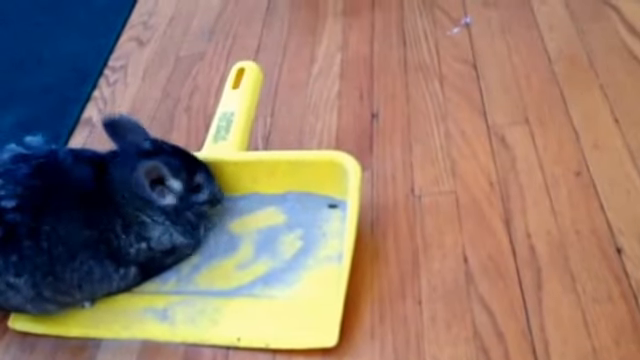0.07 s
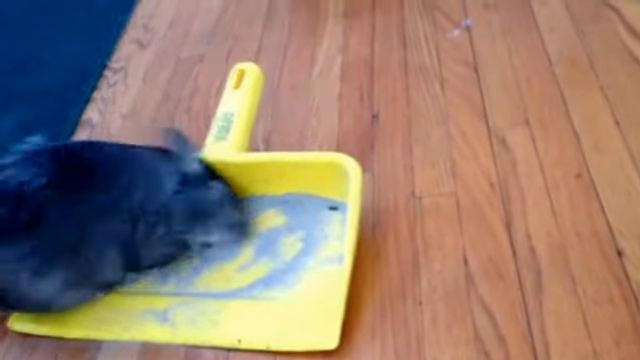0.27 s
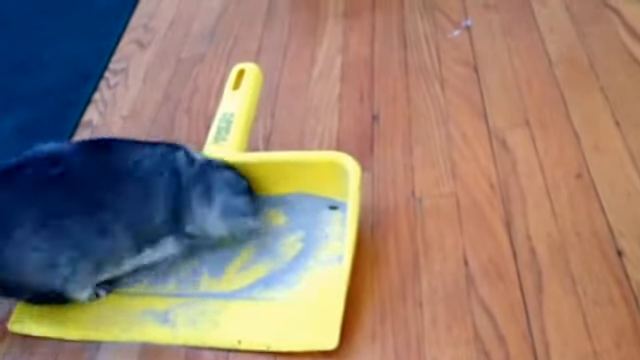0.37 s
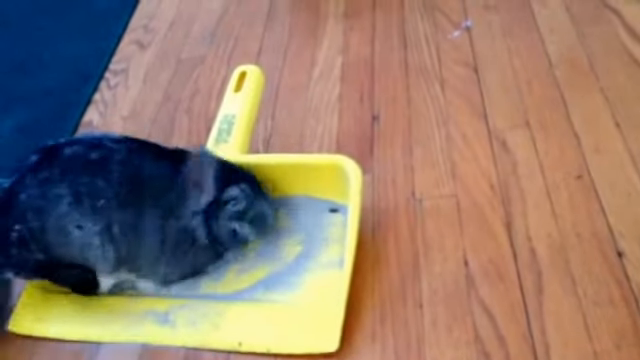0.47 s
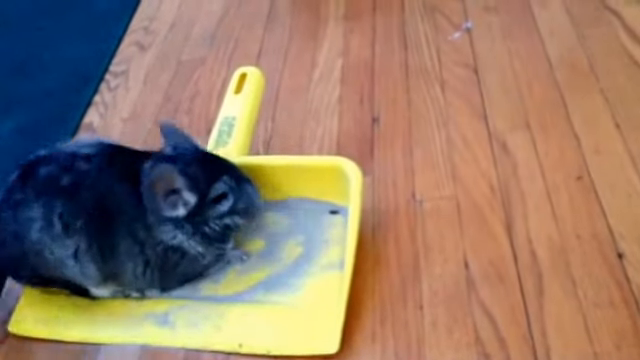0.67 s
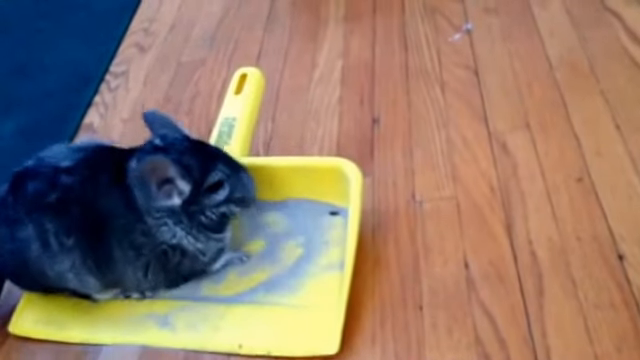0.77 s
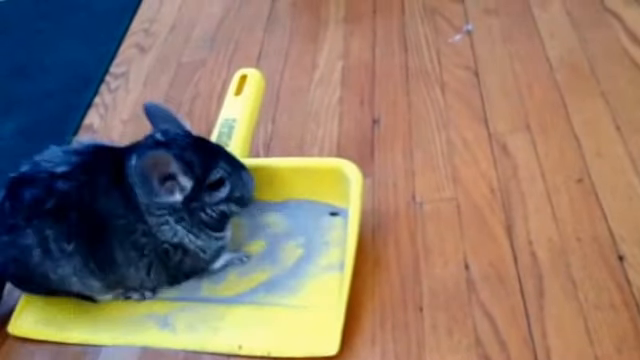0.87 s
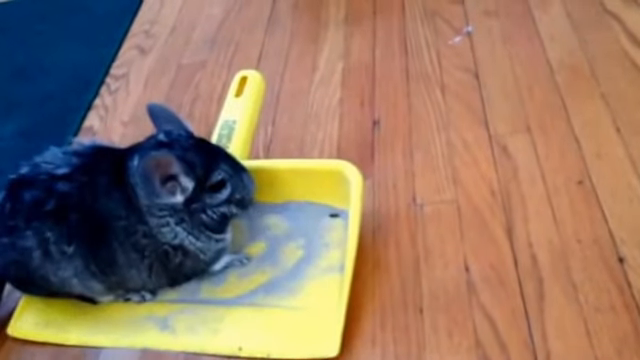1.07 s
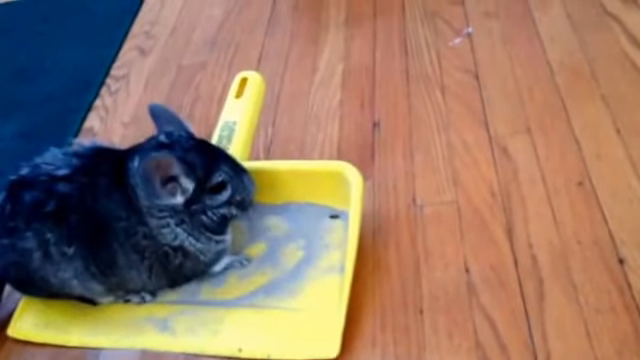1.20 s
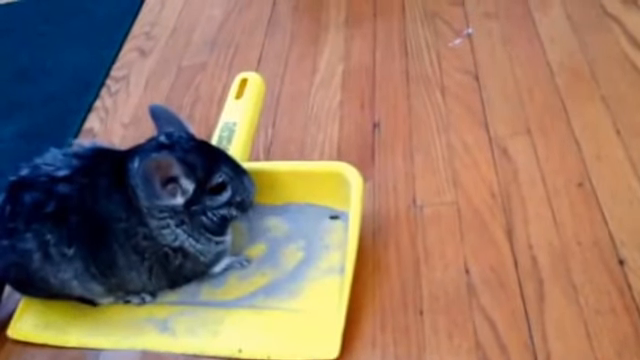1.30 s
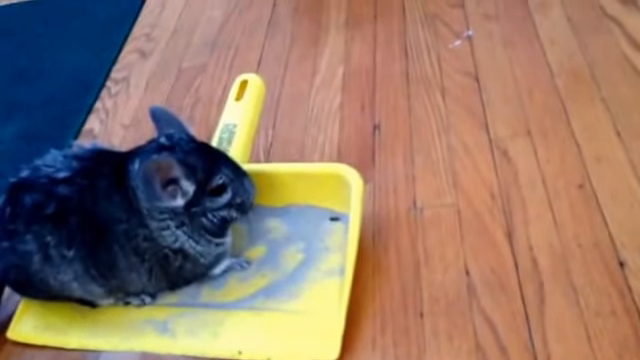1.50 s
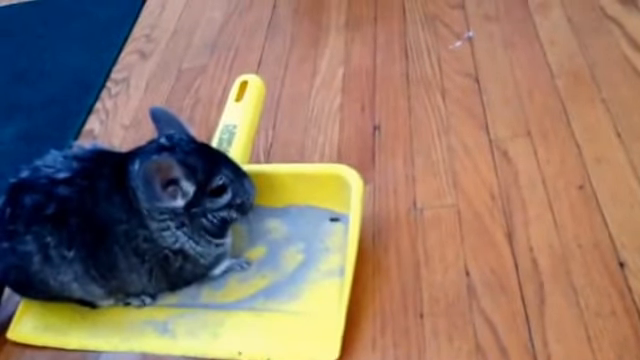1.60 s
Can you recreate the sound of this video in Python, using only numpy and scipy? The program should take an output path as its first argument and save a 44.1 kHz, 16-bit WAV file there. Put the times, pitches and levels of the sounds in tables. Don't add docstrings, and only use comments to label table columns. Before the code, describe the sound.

Faint rustling of a small furry animal leads to two hollow plastic knocks on a wooden floor, a quick clatter and claw scuffs, fading into quiet room tone with low rumble and microphone hiss.

```python
import sys
import numpy as np
from scipy import signal
from scipy.fft import rfft, irfft
from scipy.io import wavfile
from scipy.ndimage import uniform_filter1d

SR = 44100
rng = np.random.default_rng(int(sys.argv[2]) if len(sys.argv) > 2 else 0)


def gain_from_db(level_db):
    decades = np.asarray(level_db, float) / 20
    return 10 ** decades


def dump(signal):
    limited = np.clip(np.atleast_2d(signal).T, -1, 1)
    pcm = np.round(limited * 32767).astype(np.int16)
    wavfile.write(sys.argv[1], SR, pcm)


N = 72765
ROOM_DB, BRIGHT_ROOM_DB = -10, -9


def evened(x):
    return x / np.sqrt(np.mean(x ** 2) + 1e-20)


def read(points, hz):
    f, value = np.transpose(points)
    return np.interp(np.log(hz + 1), np.log(f + 1), value)


def add(mix, start_s, sound):
    part = mix[round(start_s * SR):][:len(sound)]
    part += sound[:len(part)]


def colour(x, points):
    gain = gain_from_db(read(points, np.fft.rfftfreq(len(x), 1 / SR)))
    return irfft(rfft(x) * gain, len(x))


def resonate(x, hz, width_hz):
    pole = np.exp((2j * hz - abs(width_hz)) * np.pi / SR)
    return 2 * signal.lfilter([1 - abs(pole)], [1, -pole], x).real


def resonate_twice(x, hz, width_hz):
    return resonate(resonate(x, hz, width_hz), hz, width_hz)


# f/Hz, level/dB, t60/s
PAN_MODES = [(211, -15.5, 0.037), (325, -10, 0.056), (354, 0, 0.056), (453, 1.5, 0.06), (527, -4, 0.039),
             (615, -2, 0.015), (678, -3.5, 0.042), (793, 0, 0.039), (830, 2, 0.029), (991.4, -0.5, 0.03),
             (1107, -3.5, 0.036), (1261, -6.5, 0.037), (1512, -3.5, 0.063), (1820, -12.5, 0.014)]


def pan_ring(t, blow_db, contact_ms, chance, sides):
    scatter_db = 2
    ring = np.zeros(len(t))
    for (hz, db, t60), c, side in zip(PAN_MODES, chance, sides):
        ring += side * gain_from_db(db + scatter_db * c - 60 * t / t60) * np.sin(2 * np.pi * hz * t)
    u = t[:800] * 3000 / contact_ms
    force = u * np.exp(-u)
    return gain_from_db(blow_db - 8.5) * signal.fftconvolve(ring, force / sum(force))


def board_boom(t):
    hz, db, t60_s, rise_s = 74, -26, 0.88, 0.025
    return gain_from_db(db - 60 * t / t60_s) * (1 - np.exp(-t / rise_s)) * np.sin(2 * np.pi * hz * t)


# f/Hz, width/Hz, level/dB
EDGE_MODES = [(2180, 1660, 10), (3400, 1400, 8.6), (4600, 1900, 4), (6100, 500, -1.5), (7870, 2200, -18),
              (11700, 3500, -30)]


def edge_crack(crack_db, noise):
    rise_ms, grit_db = 0.55, -6
    u = np.arange(len(noise)) / SR * 1000 / rise_ms
    snap = np.pad(gain_from_db(grit_db) * noise * u * np.exp(-u * u), (0, 2000))
    snap[round(rise_ms * SR / 1000)] -= 1
    crack = sum(gain_from_db(db) * resonate_twice(snap, hz, width) for hz, width, db in EDGE_MODES)
    return gain_from_db(crack_db) * crack / abs(crack).max()


# t/s, edge crack level/dB, blow level/dB, contact/ms
KNOCKS = [(.196, -68, -47.5, 0.22), (.208, -56, -48, 0.23), (.2218, -34.5, -28.5, 0.25),
          (.2335, -48, -40, 0.15), (.2435, -52, -39, 0.3), (.2555, -68, -35, 0.46), (.282, -51, -43, 0.21),
          (.3526, -14, -24.5, 0.16), (.358, -52, -30.5, 0.2), (.369, -56, -35, 0.22),
          (.3865, -56, -32, 0.14), (.424, -58, -37.5, 0.29), (.448, -63, -47.5, 0.45),
          (.478, -41.5, -42.5, 0.72), (.495, -55, -48, .4), (.598, -62, -54, .7)]


def knocks():
    pan_cut_hz, ring_delay_s = 151, 0.00052
    rattle_db, crack_rattle_db, rattle_speed = -4.5, -11, 6.1
    t = np.arange(SR // 2) / SR
    body, boards, edge = np.zeros((3, N))
    chance = rng.standard_normal((30, len(PAN_MODES)))
    grit = rng.standard_normal((30, 80))
    sides = rng.choice([-1., 1.], chance.shape)
    boom = board_boom(t)
    for k, (start_s, crack_db, blow_db, contact_ms) in enumerate(KNOCKS):
        add(body, start_s + ring_delay_s, pan_ring(t, blow_db, contact_ms, chance[k], sides[k]))
        add(boards, start_s, gain_from_db(blow_db - 5) * boom)
        add(edge, start_s, edge_crack(crack_db, grit[k]))
    high_pass = signal.butter(4, pan_cut_hz, "high", fs=SR, output="sos")
    body = signal.sosfilt(high_pass, body)
    rattle = room(gain_from_db(rattle_db) * body + gain_from_db(crack_rattle_db) * edge, rattle_speed)
    echo = room(gain_from_db(ROOM_DB) * body + gain_from_db(BRIGHT_ROOM_DB) * edge)
    return body + rattle + boards + edge + echo


# t/s, level/dB, f/Hz
TICKS = [(0.1031, -39.5, 4300), (0.1039, -40.5, 4900), (0.2221, -29.5, 4600), (0.3468, -37, 3450),
         (0.4762, -40, 4200), (.477, -45, 9700), (.5435, -66, 7200), (.5437, -47, 11500),
         (0.546, -40.5, 3400), (0.52, -51, 5000), (.572, -49, 6660)]
# t/s, level/dB, f/Hz, swell/ms
THUMPS = [(.224, -40.5, 234, 10.7), (.285, -53, 247, 17), (.357, -34.5, 243.8, 11.1), (.353, -34, 610, 4.2),
          (.354, -38, 830, 6), (.358, -41.5, 447, 9.3), (0.21, -45, 450, 9.4), (.223, -42, 618, 4.7),
          (0.39, -50, 260, 7.7), (0.44, -46, 270, 12), (.541, -43, 243, 4.9), (0.64, -61, 124, 8.6)]


def claws_and_thumps():
    tick_ms = 0.11
    t, out = np.arange(8000) / SR, np.zeros(N)
    for start_s, db, hz, swell_ms in [(*tick, tick_ms) for tick in TICKS] + THUMPS:
        u = t * 1000 / swell_ms
        swell = np.e * u * np.exp(-u)
        add(out, start_s, gain_from_db(db) * swell * np.sin(2 * np.pi * hz * t))
    return out + gain_from_db(BRIGHT_ROOM_DB) * room(out)


# t/s, level/dB
SHUFFLE = [
    [(.0, -67), (.09, -67.5), (.105, -60.5), (.16, -58.5), (.21, -54.5), (.24, -60.5), (.3, -67),
     (.338, -66)],
    [(.342, -66), (.346, -53), (.37, -62), (.42, -60), (.5, -68.5), (.525, -58.5), (.575, -65), (.63, -78)],
]
# f/Hz, level/dB per Hz
FUR = [(120, -44), (200, 0.5), (304, -4.5), (1030, -4), (1230, -11.5), (1380, -4.5), (6110, -6.5),
       (15400, -12.5)]


def shuffle():
    grains_per_s, grain_spread_db, fur_db, scrape_db = 14000, 4.5, 2.5, -23
    t, level = np.arange(N) / SR, np.zeros(N)
    for part in SHUFFLE:
        part_s, db = np.transpose(part)
        level += gain_from_db(np.interp(t, part_s, db, -99, -99))
    level = uniform_filter1d(level, size=300)
    strength = gain_from_db(grain_spread_db * np.minimum(rng.exponential(1, N), 3))
    grains = strength * rng.standard_normal(N) * (rng.random(N) < grains_per_s / SR)
    fur = evened(colour(grains + 0.5 * room(grains), FUR))
    scrape = evened(sum(gain_from_db(db) * resonate(grains, hz, 48) for hz, db, t60 in PAN_MODES))
    near = level * (gain_from_db(fur_db) * fur + gain_from_db(scrape_db) * scrape)
    return near + gain_from_db(ROOM_DB) * room(near)


# f/Hz, t60/s
ROOM_T60 = [(150, 0.48), (500, 0.56), (1500, 0.52), (4000, 0.33), (12000, 0.33)]


def room(x, speed=1):
    taps, spacing = np.zeros(SR), 20
    at = np.arange(60, SR - spacing, spacing)
    signs = rng.choice([-1., 1.], len(at))
    taps[at + rng.integers(0, spacing, len(at))] = signs
    hz, t, bands = signal.stft(taps, SR, nperseg=256)
    decay = gain_from_db(-60 * speed * t / read(ROOM_T60, hz)[:, None])
    tail = signal.istft(bands * decay, SR, nperseg=256)[1]
    return signal.fftconvolve(x, tail / np.linalg.norm(tail))[:N]


# f/Hz, level/dB per Hz
HISS = [(88, -69), (150, -5), (234, -1), (359, -9), (380, -7.5), (427, -8), (490, -11), (13200, -14.5),
        (15400, -17)]
# f/Hz, level/dB per Hz
RUMBLE = [(15, -62), (25, -14), (51, -6.5), (92, 0), (132, -2), (170, -13.5), (220, -56), (370, -120)]
# f/Hz, width/Hz, level/dB
HUMS = [(85.7, 11.4, -84), (106.8, 2.8, -77), (222, 12, -99), (353, 14, -86.5)]
# t/s, f/Hz, level/dB
DRONES = [
    [(0, 69, -66), (.09, 72.2, -77.5), (.17, 74, -63), (.21, 75, -86), (.26, 74.7, -58.5), (.34, 74, -80),
     (.37, 74.6, -52.5), (.43, 75.7, -53.5), (.5, 75, -82), (.585, 73.8, -62.5), (.7, 78, -80),
     (.86, 75.7, -69), (1.04, 72, -75), (1.13, 71.5, -75), (1.25, 71.3, -65), (1.33, 72.7, -76),
     (1.5, 72.8, -66), (1.65, 74, -63.5)],
    [(0.0, 121, -71.5), (0.104, 116, -70.5), (0.132, 117, -70), (0.216, 118, -96), (0.238, 121, -63),
     (0.352, 118, -86), (0.366, 113, -57), (0.436, 110.4, -64), (0.5, 119.2, -87), (0.55, 120.3, -62.5),
     (0.684, 119.7, -77), (1.092, 120.6, -71.5), (1.64, 117.6, -72), (1.65, 123, -76)],
]


def quiet_room():
    hiss_db, rumble_db = -64.5, -72.5
    hiss, rumble, stir = rng.standard_normal((3, N))
    t = np.arange(N) / SR
    hums = sum(gain_from_db(db) * evened(resonate_twice(stir, hz, width)) for hz, width, db in HUMS)
    for point_s, hz, db in map(np.transpose, DRONES):
        phase = 2 * np.pi * np.cumsum(np.interp(t, point_s, hz)) / SR
        hums += np.sqrt(2) * gain_from_db(np.interp(t, point_s, db)) * np.sin(phase)
    hiss = gain_from_db(hiss_db) * evened(colour(hiss, HISS))
    return hiss + gain_from_db(rumble_db) * evened(colour(rumble, RUMBLE)) + hums


def scene():
    mono = knocks() + claws_and_thumps() + shuffle() + quiet_room()
    return np.array([mono, mono])


def top_cut(x):
    return signal.sosfilt(signal.butter(12, 15600, fs=SR, output="sos"), x)


def record(dry):
    edge_hz, stray_db = 15400, -75
    bins = np.zeros((N // 1024 + 2, 1025), complex)
    for frame, band in zip(rng.integers(26, len(bins), 14), rng.integers(200, 600, 14)):
        bins[frame, band:band + 80] = np.exp(2j * np.pi * rng.random(80))
    wisps = gain_from_db(stray_db - 12) * evened(signal.istft(bins.T, nperseg=2048)[1][:N])
    stereo = dry + np.outer([1, -1], wisps)
    low_pass = signal.firwin(801, edge_hz, window=("kaiser", 9), fs=SR)[None]
    mix = signal.oaconvolve(stereo, low_pass, "same")
    return top_cut(mix)


dry = scene()
out = record(dry)
dump(out)
```